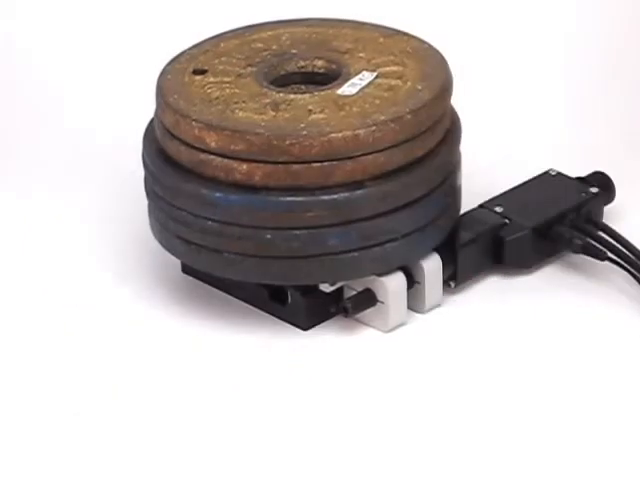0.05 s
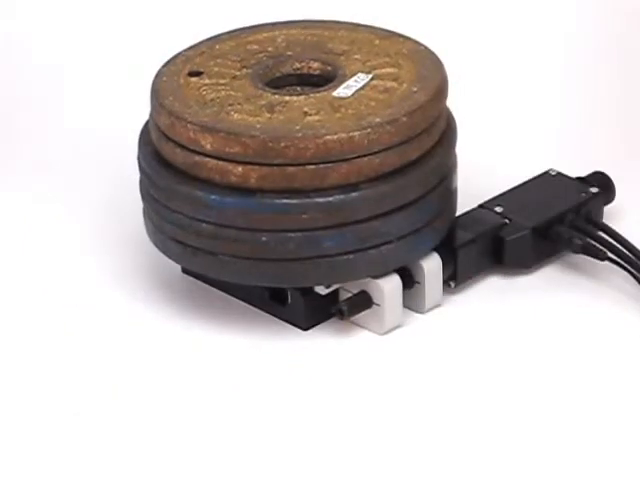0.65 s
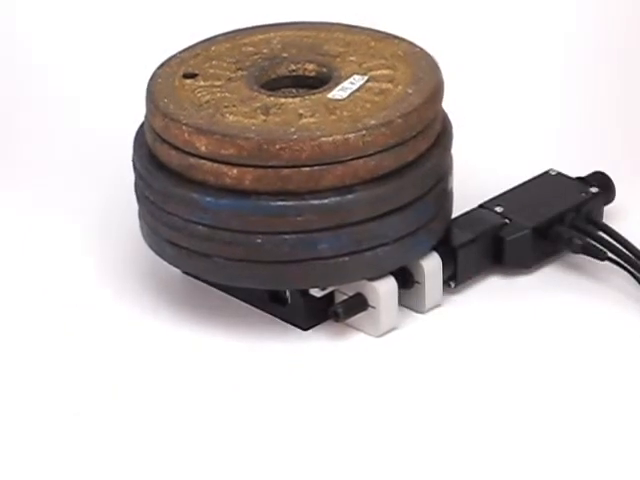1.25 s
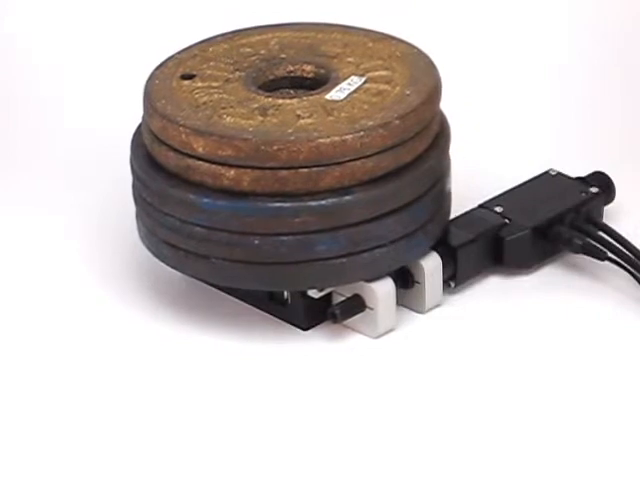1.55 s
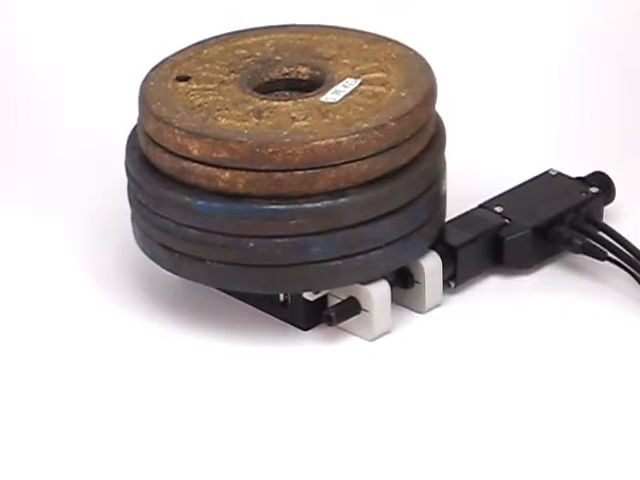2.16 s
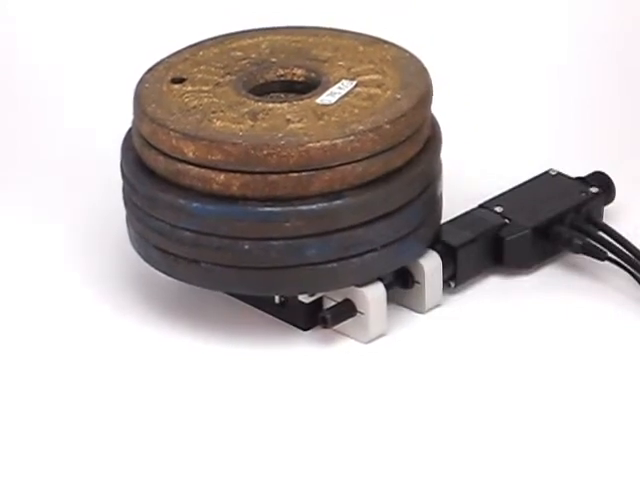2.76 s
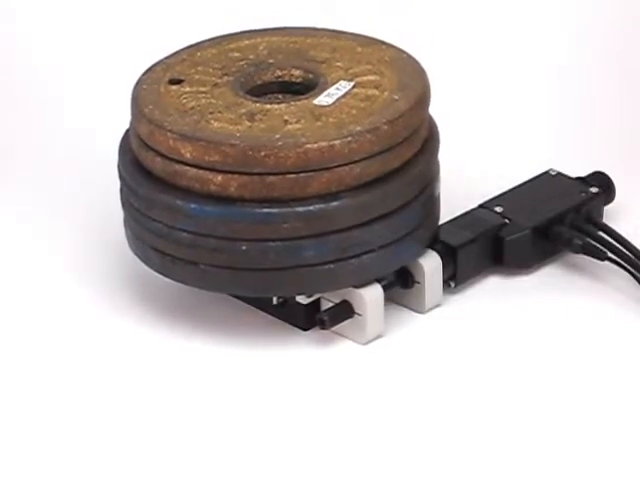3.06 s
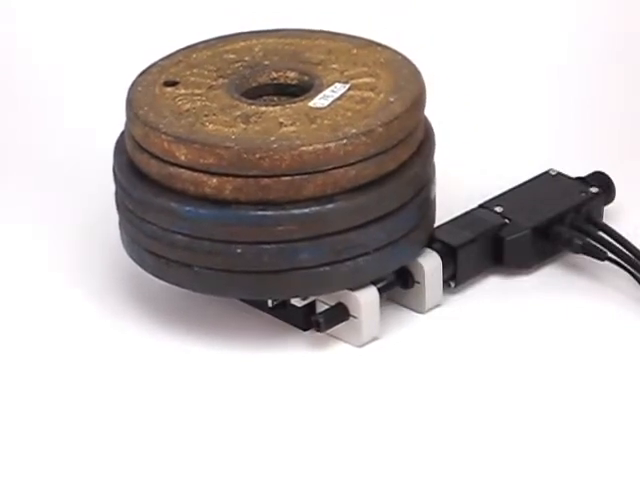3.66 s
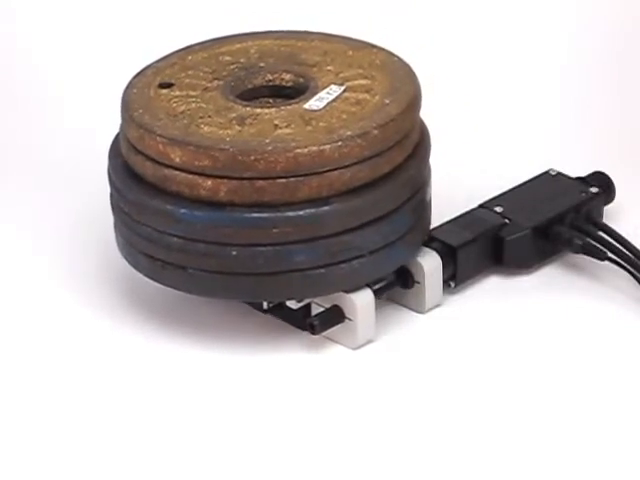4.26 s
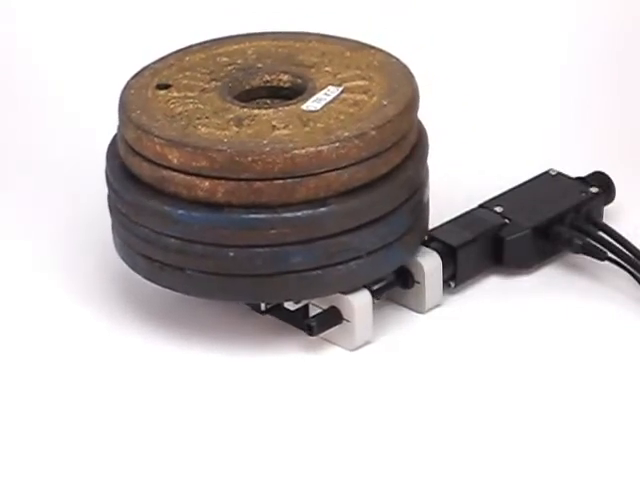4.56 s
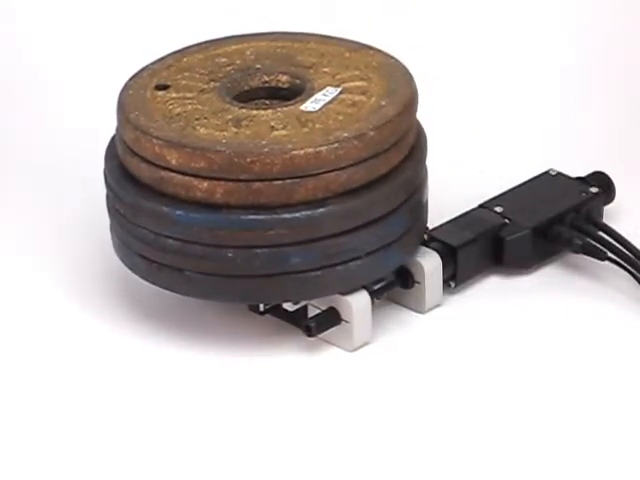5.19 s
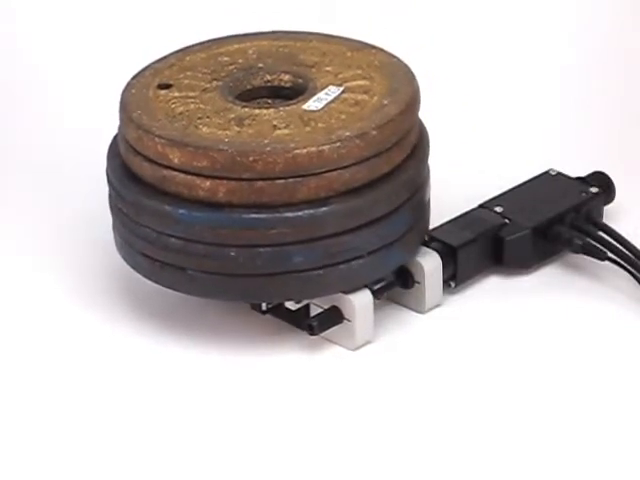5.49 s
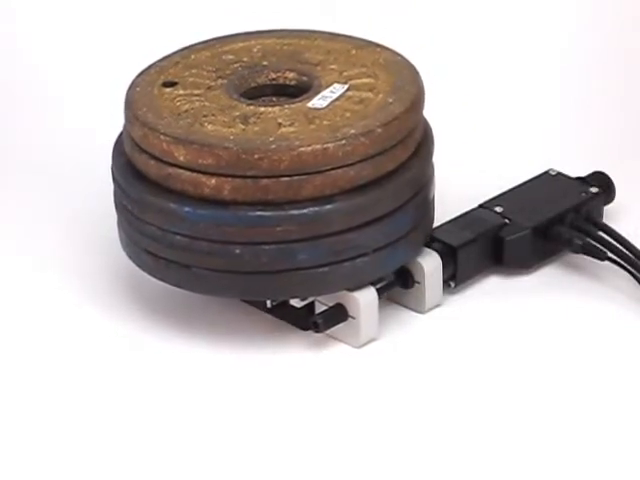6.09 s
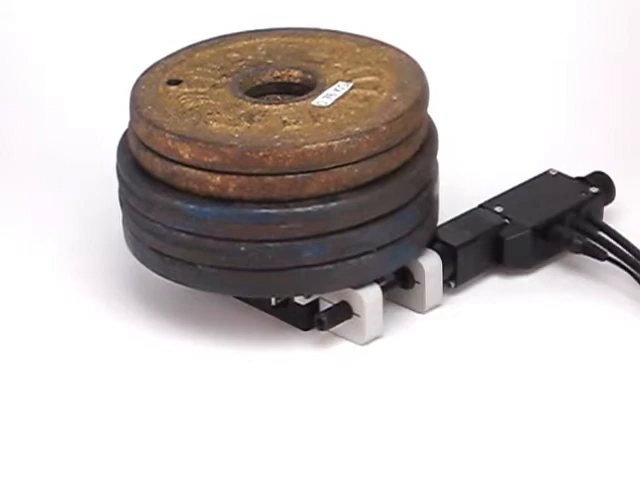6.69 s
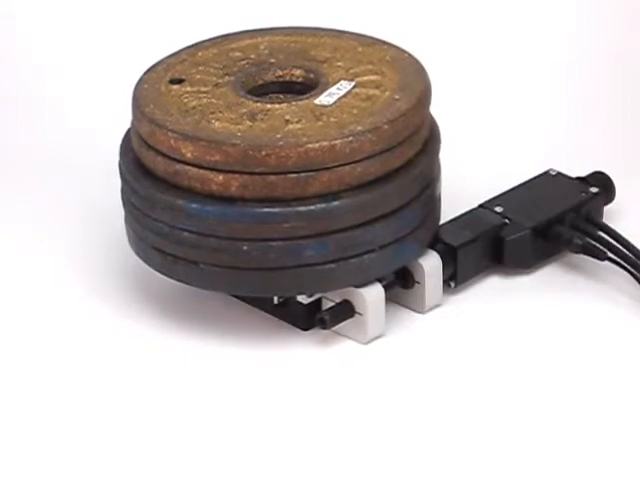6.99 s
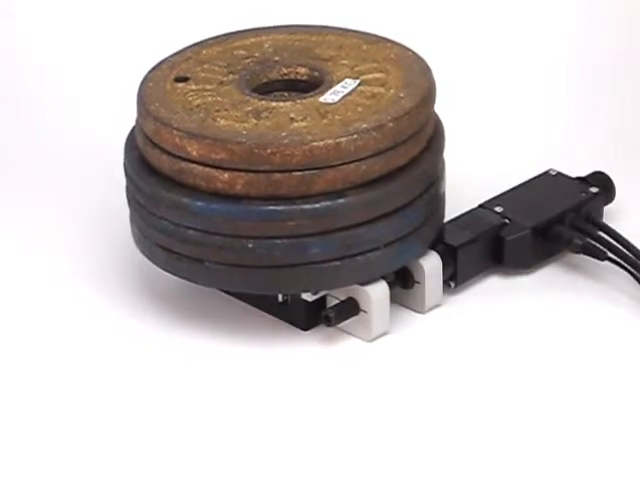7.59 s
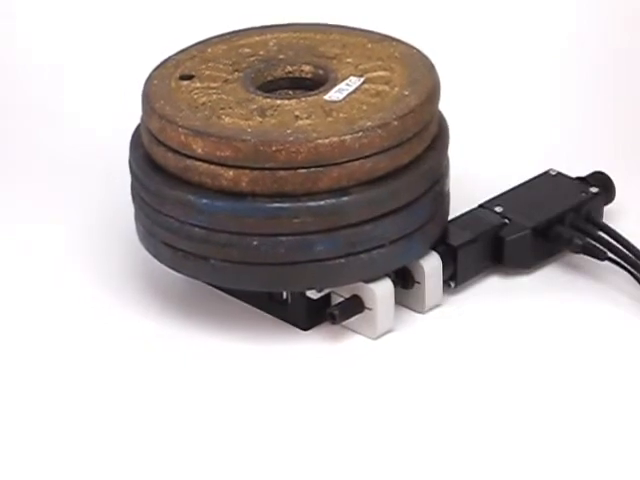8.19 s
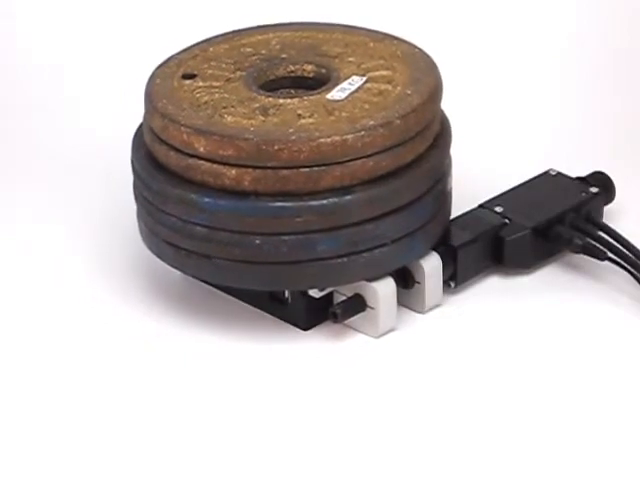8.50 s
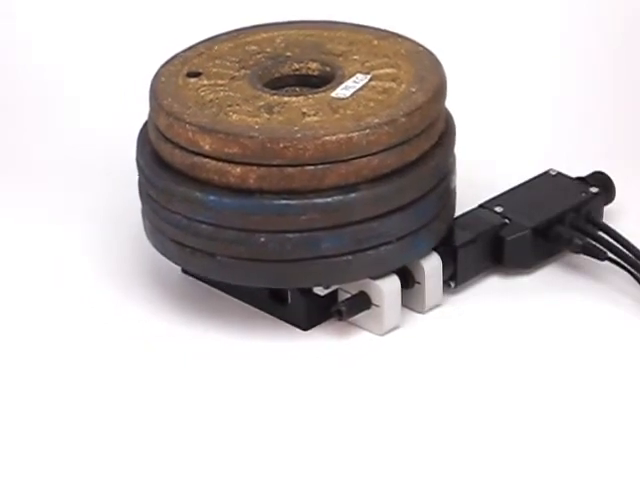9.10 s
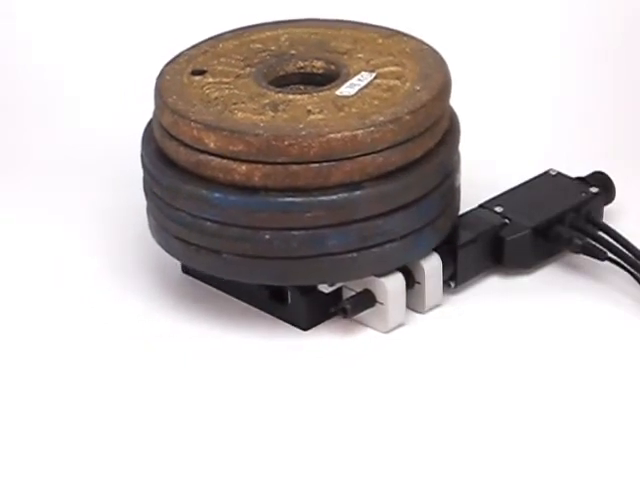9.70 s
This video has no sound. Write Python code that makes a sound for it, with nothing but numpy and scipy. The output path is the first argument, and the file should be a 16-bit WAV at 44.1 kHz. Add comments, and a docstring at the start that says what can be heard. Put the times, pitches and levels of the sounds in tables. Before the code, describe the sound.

A small electric motor whines steadily, sliding a stack of weights, with one quick pitch dip as it reverses in a quiet room.

```python
"""A stepper motor in a quiet room, on one microphone: it drives a linear stage loaded with iron weights
out along its lead screw, brakes, and runs it back. The step rate whines and throbs once a shaft turn,
uneven rotor teeth flutter, and the coil drive adds a thin high tone. Behind them sit a low drone,
rolling bearings, room air and hum. At the far end the whine sweeps through the stage's resonances
and rings in the room. Everything fades in and out."""
import sys
import numpy as np
from scipy import signal
from scipy.fft import rfft, irfft, next_fast_len
from scipy.io import wavfile
from scipy.ndimage import uniform_filter1d

SR = 44100
rng = np.random.default_rng(int(sys.argv[2]) if len(sys.argv) > 2 else 0)


def wav_record(signal):
    """Record a signal, one row per channel, as 16-bit PCM in the file named by sys.argv[1]."""
    frames = np.transpose(np.atleast_2d(signal))
    bounded = np.clip(frames, -1, 1)
    # unit amplitude maps onto the largest positive 16-bit level
    quanta = np.round(bounded * 32767).astype(np.int16)
    wavfile.write(sys.argv[1], SR, quanta)


N = 434385
T = np.arange(N) / SR
STEP_HZ, STEPS_PER_TURN = 1445.05, 200
REVERSAL_S, BRAKE_S = 5.018, .0875

# resonances of the stage: (frequency [Hz], width [Hz], relative level [dB])
STAGE_MODES = [(915, 140, -3.5), (1270, 88, 6.5), (1396, 72, 5)]
# where the screw binds once a turn: (start [s], end [s], depth [dB], loudest shaft angle [turns])
TIGHT_STRETCHES = [(.2, 3.03, 1.46, 0.42), (3.3, 4.7, 1.1, .02), (4.9, 9.1, 1.3, .42)]
# lines from uneven rotor teeth: (order [cycles/turn, rounded in use], level out [dB], level back [dB])
TOOTH_LINES = [(48, -70, -68), (49, -80, -76.5), (50, -67.5, -67.5), (137.8, -80, -81), (149.8, -67, -69.5),
               (151, -83, -76.5), (152.44, -65, -69.5), (160.3, -82, -79), (166.2, -82, -79),
               (177, -73, -74.5), (243.7, -78, -77), (246.9, -78.5, -75), (248.2, -63, -63),
               (249, -74.5, -74), (249.9, -68, -67)]
# side tones of the coil drive: (offset from its tone [cycles/turn, rounded in use], level [dB])
COIL_SIDE_TONES = [(-100, -86), (-48, -81), (0.5, -86), (2, -77.5), (47.5, -82), (48.5, -83), (50.5, -78.5),
                   (100, -79.5)]
# where the coil tone dips once a turn: (start [s], end [s], depth [dB], quietest shaft angle [turns])
COIL_STUTTERS = [(4.1, 4.7, 19, .02), (8.2, 10.3, 3.5, .78)]
# swells of the low drone: (start [s], end [s], peak level [dB])
DRONE_SWELLS = [(.3, .98, -56), (1.06, 2.318, -52.6), (2.34, 3.07, -52.5), (3.1, 4, -48.5),
                (3.83, 4.54, -49.7), (4.72, 5.35, -55.2), (5.15, 6.18, -56.5)]
# rolling noise: (frequency [Hz], resonance width [Hz], level out [dB], level back [dB])
BEARING_BANDS = [(313, 38, -69.5, -73), (399, 16.4, -65, -65.5), (495.7, 12, -72.5, -68.5),
                 (1434, 120, -63.5, -63), (3013, 150, -73, -78)]
# spectrum of room air and hiss: (frequency [Hz], relative density [dB])
AIR_SPECTRUM = [(20, -4), (35, 1.5), (65, -3.5), (125, 3.5), (260, -1), (600, -2.5), (1300, -5),
                (2200, -8.5), (4200, -11), (8200, -17), (10000, -13.5), (12700, -18), (13500, -11.5),
                (15000, -19)]
# mains hum and electronics: (frequency [Hz], level [dB])
HUM_LINES = [(120, -67.5), (175.8, -71.5), (240, -72.5), (746, -76), (7560, -71.5), (7590, -86),
             (7870, -79), (9470, -77), (11779, -76), (15100, -82)]


def undb(db):
    """Decibels to gain."""
    return 10 ** (np.asarray(db) / 20)


def unit(x):
    """Scale to rms 1."""
    return x / np.sqrt(np.mean(x ** 2))


def tone(cycles):
    """Sine of rms 1 on a phase counted in cycles."""
    return np.sqrt(2) * np.cos(2 * np.pi * cycles)


def wander(rate_hz):
    """Smooth random drift of rms 1."""
    size = int(SR / rate_hz)
    held = np.repeat(rng.standard_normal(N // size + 1), size)
    return unit(uniform_filter1d(uniform_filter1d(held, size), size)[:N])


def resonance(hz, centre_hz, width_hz):
    """Gain of one mode, 1 at its centre."""
    return np.abs(hz * width_hz / (centre_hz ** 2 - hz ** 2 + 1j * hz * width_hz))


def noise(colour):
    """Noise of rms 1 shaped by a gain that depends on frequency."""
    size = next_fast_len(N, True)
    hz = np.arange(size // 2 + 1) * SR / size
    return unit(irfft(rfft(rng.standard_normal(size)) * colour(hz), size)[:N])


def arch(start, end):
    """Half a sine from start to end, zero outside."""
    return np.sin(np.pi * np.clip((T - start) / (end - start), 0, 1)).clip(0)


def by_stroke(out_db, back_db):
    """Gain that changes at the reversal, as the load moves to the other flank of the thread."""
    return np.where(T < REVERSAL_S, undb(out_db), undb(back_db))


def throb(turns, depth_db, ripple_db, loud_angle):
    """Screw load in dB: one swell a turn, plus finer bumps that shift as the nut travels."""
    bumps = sum(tone(k * turns + rng.random() + 0.099 * wander(.7)) / np.sqrt(k) for k in range(2, 8))
    return depth_db * np.cos(2 * np.pi * (turns - loud_angle)) + ripple_db * unit(bumps)


def screw_binding():
    """Depth in dB and loudest shaft angle of the once-a-turn load; tight stretches come and go."""
    load = sum(db * arch(start, end) * np.exp(2j * np.pi * angle)
               for start, end, db, angle in TIGHT_STRETCHES)
    starts, ends, _, angles = np.transpose(TIGHT_STRETCHES)
    return np.abs(load), np.interp(T, (starts + ends) / 2, angles)


def stage_response(hz):
    """Gain of the stage's modes, summed in power."""
    return np.sqrt(sum((undb(db) * resonance(hz, centre, width)) ** 2
                       for centre, width, db in STAGE_MODES))


def whine_gain(place, reseat_s=0.51):
    """The whine grows toward home, steeply past a knee, and is a little louder once the nut reseats."""
    far_end_db = np.interp(T, [REVERSAL_S, REVERSAL_S + reseat_s], [-44.7, -43.4])
    knee = np.where(T < REVERSAL_S, 0.36, .55)
    homeward_db = 2.5 * (1 - place) + 3.9 * np.clip(1 - place / knee, 0, 1)
    return undb(far_end_db + homeward_db)


def step_whine(speed, turns, place):
    """The step rate shakes the stage, whose modes colour it as the speed changes."""
    depth_db, angle = screw_binding()
    load_db = throb(turns, depth_db, ripple_db=0.51, loud_angle=angle) + 0.1 * wander(25)
    swing = rotor_shudder(speed)
    # the rotor lags a little behind its field where the screw is tight
    lag = 0.039 * tone(turns - angle - .27) + 0.011 * wander(30) + 0.18 * swing
    colour = stage_response(speed * STEP_HZ) / stage_response(STEP_HZ)
    gain = whine_gain(place) * undb(load_db) * colour * (1 + swing)
    return gain * tone(STEPS_PER_TURN * turns + lag)


def rotor_teeth(speed, turns, crest_angle=.575):
    """Uneven teeth give close lines that beat into a flutter, all in step at one shaft angle."""
    lines = sum(by_stroke(out_db, back_db) * tone(round(order) * (turns - crest_angle))
                for order, out_db, back_db in TOOTH_LINES)
    return speed ** 4 * lines


def coil_drive(speed, turns, place, pitch_hz=4735, swell_place=0.37, swell_spread=0.22):
    """The drive's thin tone swells at one spot on the screw, stutters, and dies as the shaft stops."""
    carrier = pitch_hz * T + .015 * wander(20)
    swell = np.exp(-((place - swell_place) / swell_spread) ** 2)
    gain = by_stroke(out_db=-63, back_db=-61) + undb(-53.5) * swell
    wobble_db = throb(turns, depth_db=0.86, ripple_db=0.2, loud_angle=0.38) + 0.35 * wander(7)
    # one narrow dip a turn within each stuttering stretch
    dip_db = sum(db * arch(start, end) * np.exp(5 * (np.cos(2 * np.pi * (turns - angle)) - 1))
                 for start, end, db, angle in COIL_STUTTERS)
    main = gain * undb(wobble_db - dip_db) * tone(carrier)
    sides = sum(undb(db) * tone(carrier + round(order) * (turns - .5) + 0.16 * wander(5))
                for order, db in COIL_SIDE_TONES)
    return speed * (main + sides)


def low_drone(pitch_hz=201.6, bed_db=-66):
    """A low tone rises in rounded swells out of a faint steady bed."""
    swells = np.max([undb(db) * arch(start, end) ** 1.1 for start, end, db in DRONE_SWELLS], axis=0)
    return np.maximum(swells, undb(bed_db)) * tone(pitch_hz * T + 0.036 * wander(6.2))


def bearings(speed):
    """The bearings roll in narrow bands of noise, as loud as the shaft is fast."""
    return speed * sum(by_stroke(out_db, back_db) * noise(lambda hz: resonance(hz, centre, width) ** 2)
                       for centre, width, out_db, back_db in BEARING_BANDS)


def room_tone(air_db=-51.5):
    """The room around the microphone: air, smooth hiss and slightly wavering electrical hum."""
    points_hz, points_db = np.transpose(AIR_SPECTRUM)
    air = noise(lambda hz: undb(np.interp(np.log(hz + 1), np.log(points_hz), points_db)))
    hum = sum(undb(db + 0.86 * wander(2.6)) * tone(hz * T + rng.random()) for hz, db in HUM_LINES)
    return undb(air_db) * air + hum


def rotor_shudder(speed, swing_hz=150, depth=0.46):
    """Braking and starting set the rotor swinging on its magnetic spring; zero at steady speed."""
    jolted = uniform_filter1d(1. * (speed < .95), size=661)
    return depth * jolted * np.cos(2 * np.pi * (swing_hz * T + 0.35 * wander(70)))


def room_tail(direct, t60_s=0.53, wet_db=-3, gap_s=0.0093):
    """Diffuse reflections travel farther, reach the microphone after a short gap and die away."""
    t = T[:SR // 2]
    response = rng.standard_normal(len(t)) * np.exp(-np.log(1000) * t / t60_s) * (t > gap_s)
    return undb(wet_db) * signal.fftconvolve(direct, response / np.linalg.norm(response))[:N]


def fade(start_s=-0.98, end_s=11.02, ramp_s=3.93):
    """Fader over the whole scene: a straight rise from partly open, a hold, a straight fall."""
    return np.clip(np.minimum(T - start_s, end_s - T) / ramp_s, 0, 1)


def scene():
    """The motor runs out, brakes evenly to a stop and runs back; one microphone feeds both channels."""
    from_reversal_s = np.abs(T - REVERSAL_S)
    speed = np.minimum(from_reversal_s / BRAKE_S, 1)
    turns = np.cumsum(speed) * STEP_HZ / STEPS_PER_TURN / SR
    place = 1 - from_reversal_s / REVERSAL_S  # distance along the screw: 0 home, 1 far end
    whine = step_whine(speed, turns, place)
    # reflections merge with a steady tone and are heard apart only where the pitch sweeps
    sweeping = uniform_filter1d(1. * (speed < 1), size=441)
    reflections = room_tail(whine * sweeping)
    motor = whine + rotor_teeth(speed, turns) + coil_drive(speed, turns, place)
    rumble = low_drone() + bearings(speed)
    microphone = fade() * (motor + reflections + rumble + room_tone())
    return np.array([microphone, microphone])


def record(dry, top_hz=15150):
    """The recorder cuts the top steeply."""
    return signal.sosfilt(signal.ellip(12, .1, 80, top_hz, fs=SR, output="sos"), dry)


dry = scene()
out = record(dry)
wav_record(out)
```